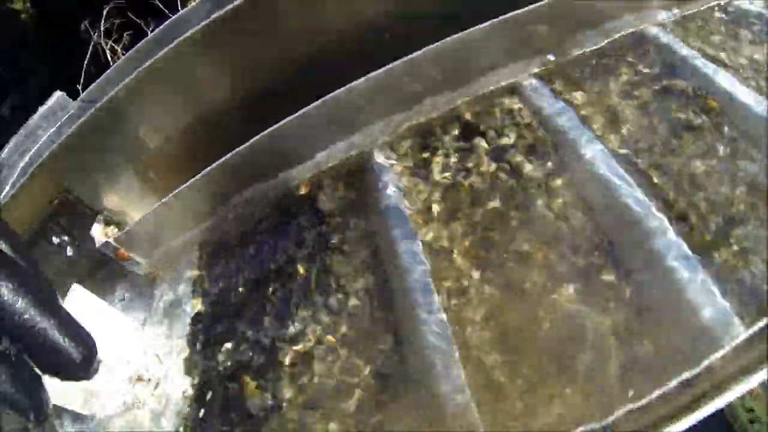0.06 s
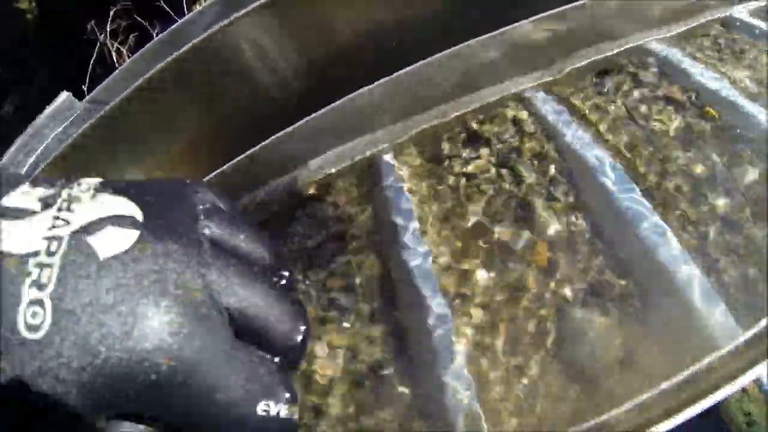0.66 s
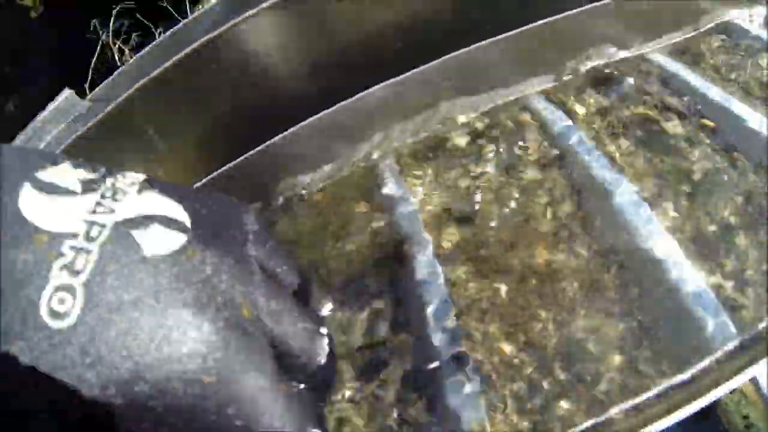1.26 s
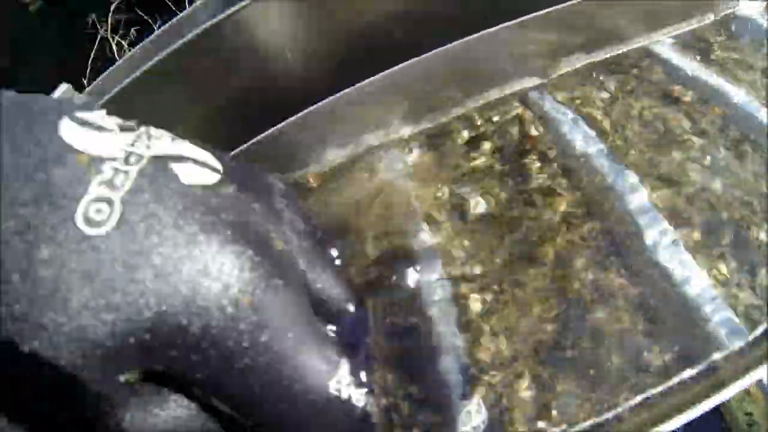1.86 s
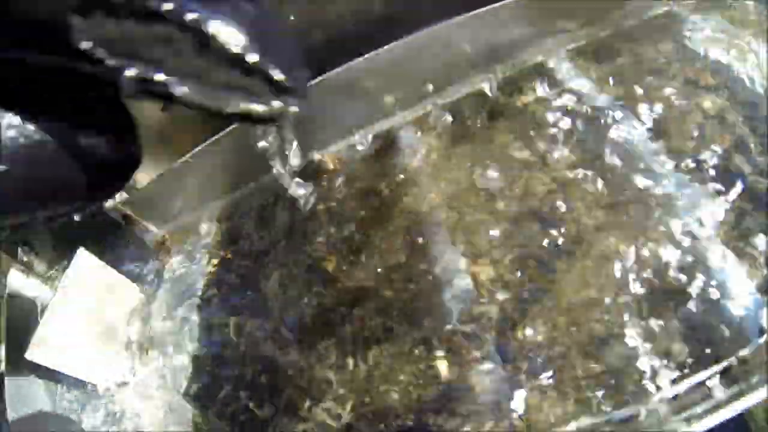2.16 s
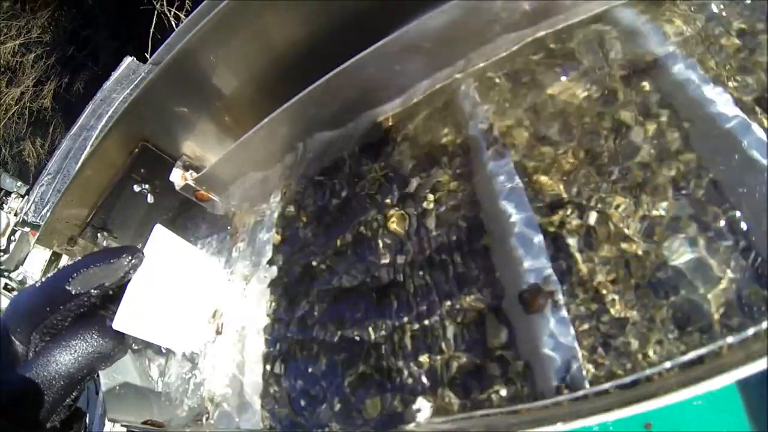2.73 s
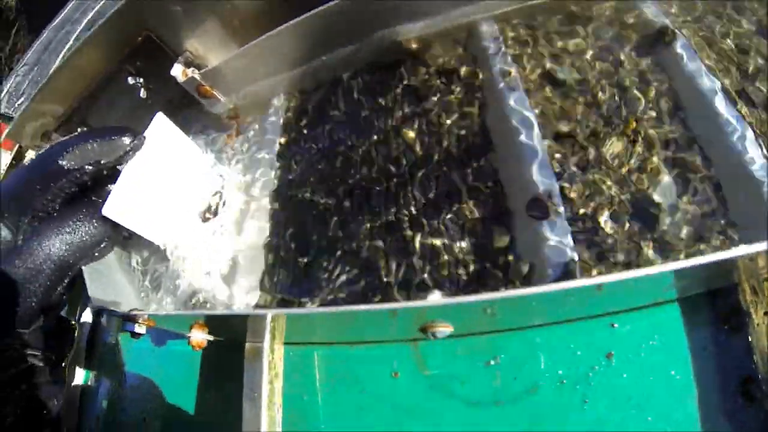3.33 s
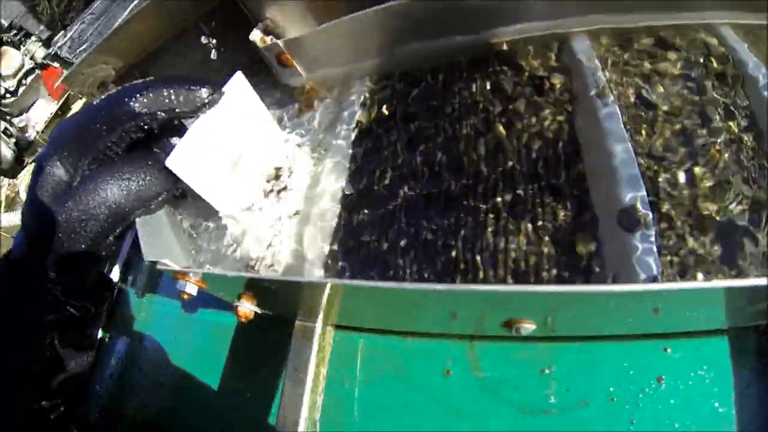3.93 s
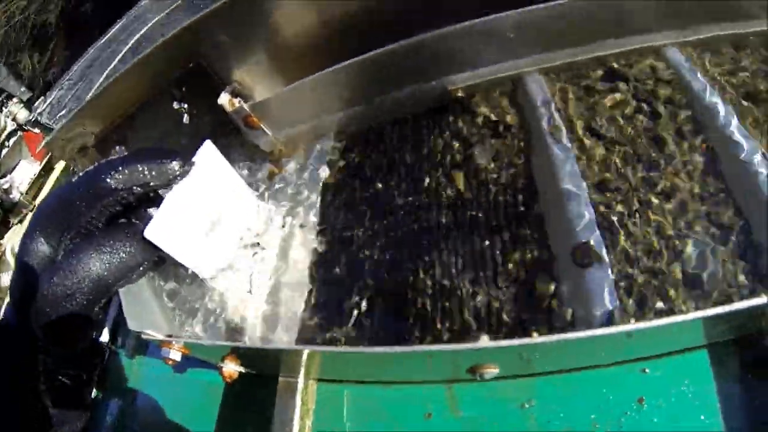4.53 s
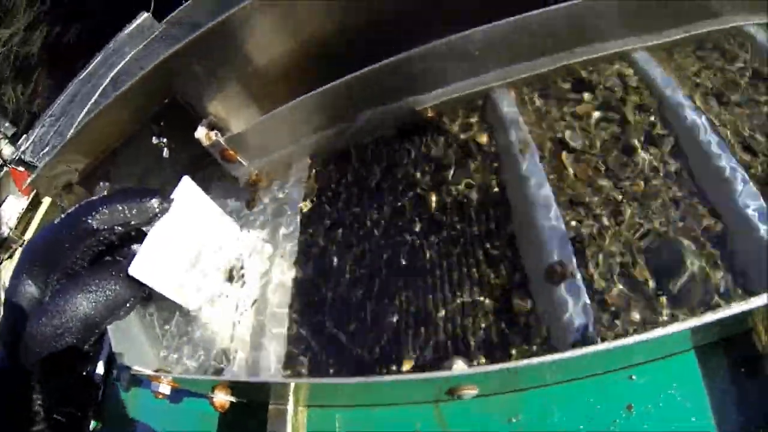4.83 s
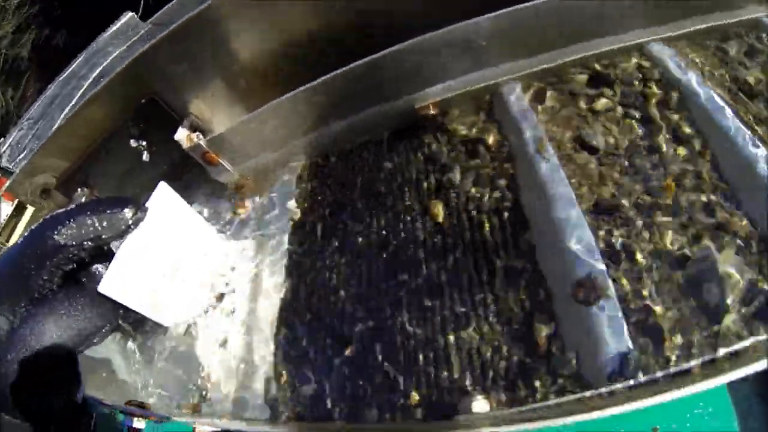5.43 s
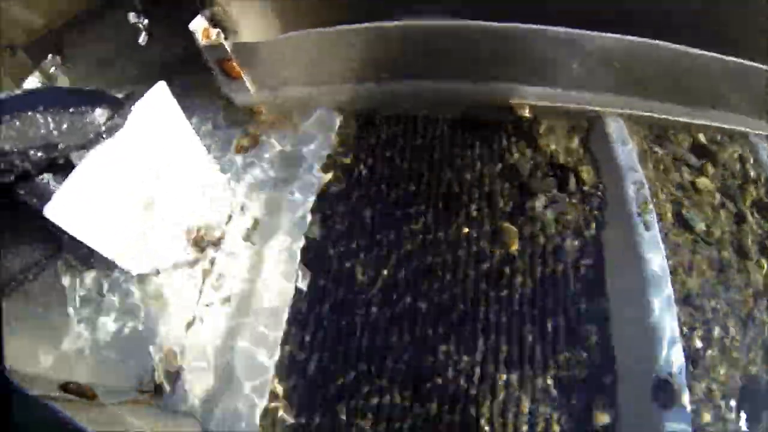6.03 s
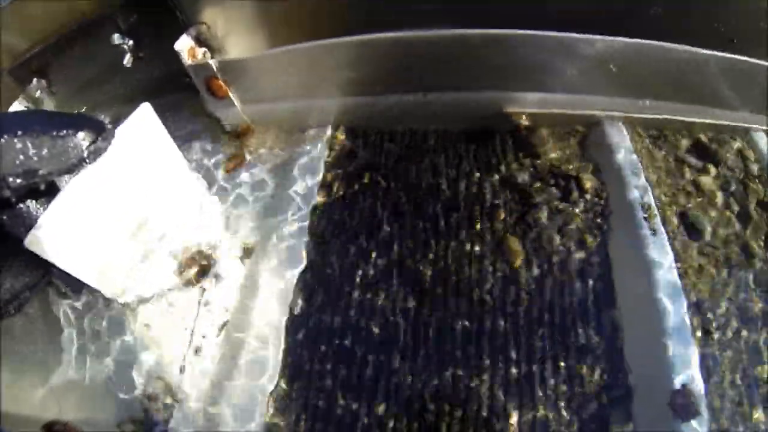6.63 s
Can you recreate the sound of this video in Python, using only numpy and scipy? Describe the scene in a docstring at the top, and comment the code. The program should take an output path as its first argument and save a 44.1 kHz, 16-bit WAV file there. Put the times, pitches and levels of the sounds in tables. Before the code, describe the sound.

Deep throbbing from a pump over a rattling motor and bubbling water, interrupted by a few drips and close handling scrapes.

```python
"""Outdoors at a small gold dredge. Its pump shakes the sluice box with a deep judder, and ticks and
knocks once a turn, while the engine drones and clatters. Water bubbles over the riffles, and a gloved
hand splashes in it a few times. A camera picks up the shaking through its body; its plastic housing
scrapes, rubs and knocks as it is shifted, and the box walls colour the sound at each position."""
import sys
import numpy as np
from scipy import signal
from scipy.fft import rfft, irfft, next_fast_len
from scipy.io import wavfile
from scipy.ndimage import map_coordinates

SR = 44100
rng = np.random.default_rng(int(sys.argv[2]) if len(sys.argv) > 2 else 0)


def put_to_file(sound):
    """Save the sound as 16-bit audio at rate SR, in the file named by the first command-line argument."""
    columns = np.atleast_2d(sound).T  # one column per channel
    safe = np.clip(columns, -1, 1)
    whole_steps = np.round(safe * 32767)
    wavfile.write(sys.argv[1], SR, whole_steps.astype(np.int16))


N = 294588

PUMP_HZ, ENGINE_HZ = 11.014, 25.07  # pump turns and engine cycles a second
FIRST_TICK_S, MOVE_S = .039, .2  # the pump's first tick; the time a camera move takes


# how hard the box sways the camera: (time [s], level [dB])
SWAY_LEVEL = [(0, -7), (2.65, -9), (2.93, -20), (3.25, -12.5), (3.55, -14.5), (3.85, -11.5), (4.9, -11.5),
              (5.5, -21), (5.75, -35), (6.15, -35), (6.46, -27), (6.68, -41)]
# overtones of the shaking: (multiple of the pump rate, steady weight [dB], weight in a swell [dB])
JUDDER_OVERTONES = [(1, -20, -8), (3, -8, -1), (4, 1.5, 1), (5, -14, -10), (6, -5, -9), (7, -11.5, -7),
                    (8, -5.5, 0.5), (9, -13.5, -20.5), (10, -19, -14), (11, -13.5, -13), (12, -14.5, -21.5),
                    (13, -21, -21), (14, -24.5, -19), (16, -28.5, -32)]
# the judder builds and eases: (peak time [s], level [dB], rise [s], fall [s])
JUDDER_SWELLS = [(3.42, -29.5, 0.17, 0.27), (3.98, -26, 0.99, 0.94)]
# tone of the frame's loose rumble: (frequency [Hz], gain [dB])
RUMBLE_EQ = [(20, -2.5), (45, -2), (85, 0), (122, 3.5), (150, -12.5), (200, -14.5), (300, -39), (600, -70)]
# surges of rumble as the camera is jolted: (peak time [s], level [dB], rise [s], fall [s])
RUMBLE_JOLTS = [(2.85, -16, 0.11, 0.12), (3.03, -18.5, 0.041, 0.04), (3.27, -27.5, 0.087, 1.1),
                (3.69, -22, 0.12, 0.21), (4.6, -33, 0.45, 1.55), (5.78, -26, 0.18, 0.2),
                (6.06, -29.5, 0.057, 0.054), (6.47, -30.5, 0.43, 0.46)]

def pump(stroke_lag_s=.0112, judder_db=-29.5, rumble_db=-41.5, surge_db=2):
    """Two strokes a turn sway and judder the box, and its frame rumbles with each stroke."""
    sway_db = curve(SWAY_LEVEL)
    angle = 2 * np.pi * (pump_turns(stroke_lag_s) + .003 * wobble(4))
    sway = unit(np.sin(2 * angle) * amp(.5 * wobble(PUMP_HZ)))  # no two strokes push equally hard
    multiples, steady_db, swell_db = np.transpose(JUDDER_OVERTONES)
    overtones = np.array([harmonic(k, angle) for k in multiples])
    judder_gain = amp(judder_db + .81 * (sway_db - sway_db.mean()))  # rides on the sway
    judder = judder_gain * unit(amp(steady_db) @ overtones)
    judder += swells(JUDDER_SWELLS) * unit(amp(swell_db) @ overtones)
    rumble = coloured(rng.standard_normal(N) * amp(surge_db * np.cos(2 * angle)), RUMBLE_EQ)
    rumble *= np.hypot(amp(rumble_db), swells(RUMBLE_JOLTS))
    judder *= amp(1.07 * wobble(2 * PUMP_HZ))
    return amp(sway_db) * sway + judder + rumble


# metal rung by each firing: (moment in the cycle [0-1], pitch [Hz], relative level [dB], t60 [s])
CASING_RINGS = [(.08, 1155, -6, 0.057), (.45, 1203, -3.5, 0.07), (.06, 1320, -8, 0.11),
                (.22, 1393, -9.5, 0.078), (.22, 1430, -0.5, 0.12), (.06, 1505, -4.5, .07),
                (.06, 2085, -2, 0.059), (.45, 2393, -8, .05)]

def casing_knock(cycles):
    """Each part of the engine casing is struck at its own moment of the cycle and rings."""
    out = np.zeros(N)
    for moment, hz, db, t60 in CASING_RINGS:
        turns = cycles - moment + 1
        since = turns % 1 / ENGINE_HZ
        envelope = each_turn(turns, spread_db=3.74) * amp(db - 60 * since / t60)
        out += envelope * np.sin(2 * np.pi * hz * since + .15 * wobble(25))
    return out


# two buzzes a cycle: (moment in the cycle [0-1], relative level [dB], t60 [s])
BUZZ_HITS = [(.24, 3, .11), (.49, -0.5, .04)]
# the metal box's narrow band of hiss: (frequency [Hz], gain [dB])
BUZZ_EQ = [(4000, -50.5), (5100, -16), (5470, -11.5), (5750, -21.5), (7000, -43.5)]
# fader for the buzz: (time [s], level [dB])
BUZZ_LEVEL = [(0, -63.5), (3, -66.5), (3.9, -75), (5.3, -59.5), (6, -81)]

def box_buzz(cycles):
    """The engine sets the metal box buzzing in a thin, pulsing hiss."""
    pulses = sum(amp(db - 60 * ((cycles - moment) % 1) / ENGINE_HZ / t60)
                 for moment, db, t60 in BUZZ_HITS)
    return amp(curve(BUZZ_LEVEL)) * coloured(pulses * rng.standard_normal(N), BUZZ_EQ)


# fader for the engine as the camera turns: (time [s], level [dB])
ENGINE_FADER = [(0, -43.5), (2.5, -42), (3.3, -40.5), (4.2, -41), (6.68, -40.5)]
# the exhaust's drone: (multiple of the firing rate, level at the mean fader setting [dB])
EXHAUST_HARMONICS = [(5, -48), (6, -52.5), (7, -70.5), (9, -55), (11, -61), (13, -52.5), (14, -54.5),
                     (23, -59), (46, -60), (53, -58.5), (83, -62.5), (86, -60.5)]
# broad tone of the clatter: (frequency [Hz], gain [dB])
CLATTER_EQ = [(100, -6.5), (170, 1.5), (240, 0), (330, -4), (430, -10.5), (580, -10), (800, -10.5),
              (1000, -14), (1150, -3.5), (1450, -5), (1850, -19.5), (2400, -18), (3300, -16), (4500, -22.5),
              (7000, -40)]
# metallic peaks in the clatter: (centre [Hz], width [Hz], gain [dB])
CLATTER_PEAKS = [(1152, 75, 5), (1315, 60, 2), (1430, 60, 4), (1664, 150, 8), (2070, 170, 11),
                 (2310, 110, 10.5), (2880, 310, 4.5)]
# valve gear and exhaust puff:
# (moment in the cycle [0-1], centre [Hz], width [Hz], relative level [dB], t60 [s])
GEAR_CLACKS = [(.06, 2130, 900, -13.5, .025), (0.442, 2150, 800, -21, .02), (0.678, 590, 170, -15, 0.021)]

def engine(beat_db=.5, throb_db=1.76, rattle_db=1):
    """Every firing knocks, clacks and repeats a partly blurred clatter over the exhaust's drone."""
    level_db = curve(ENGINE_FADER)
    cycles = ENGINE_HZ * clock() + .002 * wobble(4)
    angle = 2 * np.pi * cycles
    cycle_samples = round(SR / ENGINE_HZ)
    loop = map_coordinates(rng.standard_normal(cycle_samples), [cycles % 1 * cycle_samples],
                           mode="grid-wrap")
    # the clatter swells with each engine cycle, each pump turn and twice a pump stroke
    pump_angle = 2 * np.pi * pump_turns()
    swell_db = beat_db * np.sin(angle) + throb_db * np.cos(pump_angle)
    swell_db += rattle_db * np.cos(4 * pump_angle)
    blows = amp(swell_db + .9 * wobble(12)) * (.55 * loop + rng.standard_normal(N))
    drone = sum(amp(db + .97 * wobble(2.88)) * harmonic(k, angle) for k, db in EXHAUST_HARMONICS)
    drone *= np.sqrt(2) * amp(level_db - level_db.mean())
    clatter = coloured(blows, CLATTER_EQ, CLATTER_PEAKS)
    clatter += casing_knock(cycles) + clacks(cycles, ENGINE_HZ, GEAR_CLACKS)
    return amp(level_db) * clatter + drone + box_buzz(cycles)


def valve(gain_db, after_tick_s, pitch_hz=545, rise_s=.02, t60_s=.061):
    """A pump valve closes once a turn with a short hollow ring."""
    turns = pump_turns(after_tick_s) + 1
    since = turns % 1 / PUMP_HZ
    ring = np.sin(2 * np.pi * pitch_hz * since + .95 * wobble(60))
    envelope = (1 - np.exp(-since / rise_s)) ** 2 * amp(gain_db - 60 * since / t60_s)
    return each_turn(turns, spread_db=2.1) * envelope * ring


# loose joints: (moment in the turn [0-1], centre [Hz], width [Hz], level [dB], t60 [s])
LINKAGE_CLACKS = [(.01, 1500, 1400, -56.5, .03), (0.699, 1075, 320, -58.5, .03)]

def linkage():
    """The pump's linkage chatters faintly twice a turn."""
    return clacks(pump_turns(), PUMP_HZ, LINKAGE_CLACKS)


# broad tone of the tick: (frequency [Hz], gain [dB])
TICK_EQ = [(2000, -1), (4000, -14), (6000, -9.5), (7500, -8), (8300, -9), (9800, -5.5), (10400, -12),
           (11400, -4), (12400, -12), (15000, -27.5)]
# its ring before the camera swings round: (centre [Hz], width [Hz], gain [dB])
TICK_PEAKS_HIGH = [(9150, 210, 9), (9950, 240, 9.5), (13100, 380, 13)]
# its ring afterwards: (centre [Hz], width [Hz], gain [dB])
TICK_PEAKS_LOW = [(6300, 350, 7), (8400, 480, 15.5), (9350, 300, 3), (9950, 200, 7)]
# fader for the ticks: (time [s], gain [dB])
TICK_FADER = [(0, -58), (2.3, -52.5), (3.2, -49.5), (4.3, -49), (5, -46.5), (5.5, -52), (5.85, -47),
              (6.68, -47)]

def ticks(swing_s=5.7, tail_db=-21, tail_t60_s=.25):
    """One fine, pitched tick with a faint sheen each pump turn; it rings lower after the swing."""
    turns = pump_turns()
    since = turns % 1 / PUMP_HZ
    decay = np.exp(-since / .0042) + amp(tail_db - 60 * since / tail_t60_s)
    envelope = each_turn(turns, spread_db=1) * (1 - np.exp(-since / .0014)) * decay
    noise = rng.standard_normal(N)
    high, low = coloured(noise, TICK_EQ, TICK_PEAKS_HIGH), coloured(noise, TICK_EQ, TICK_PEAKS_LOW)
    swung = fade_in(swing_s, MOVE_S)
    return amp(curve(TICK_FADER)) * envelope * ((1 - swung) * high + swung * low)


# broad tone of the plastic housing: (frequency [Hz], gain [dB])
SHELL_EQ = [(100, -3), (350, -17), (600, -3.5), (750, -11), (1050, -7), (1350, -3), (1550, -9.5),
            (2300, -22.5), (4500, -24.5), (5000, -26.5), (5300, -33.5), (7500, -45.5), (14000, -53.5)]
# its fixed peaks and one dip: (centre [Hz], width [Hz], gain [dB])
SHELL_PEAKS = [(778, 52, 5.5), (1022, 73, 9.5), (1940, 290, 7.5), (2830, 640, 12.5), (3390, 154, -14)]

def shell_ring(body_hz, body_db, squeak_hz, treble_db, shelf_hz=2200, size=2048):
    """The housing's ring after one tap, at peak 1; body and squeak resonances move with the grip."""
    hz = np.fft.rfftfreq(size, 1 / SR)
    peaks = list(SHELL_PEAKS) + [(body_hz, 230, body_db), (squeak_hz, 400, 18.5)]
    shelf = hz ** 4 / (hz ** 4 + shelf_hz ** 4)  # the treble needs firm contact
    cepstrum = irfft(np.log(amp(eq_db(hz, SHELL_EQ, peaks) + treble_db * shelf)))
    # minimum phase puts the attack at the front
    cepstrum[1:size // 2] *= 2
    cepstrum[size // 2 + 1:] = 0
    ring = irfft(np.exp(rfft(cepstrum)))
    return ring / np.abs(ring).max()


# when the housing is in contact: (start [s], end [s])
SCRAPE_GATES = [(2.645, 2.995), (3.54, 3.76), (5.09, 5.7), (5.66, 5.8), (6.32, 6.65)]
# hard scrapes: (peak time [s], level [dB], rise [s], fall [s], body [Hz], squeak [Hz], treble [dB])
SCRAPE_STROKES = [(2.69, -34, 0.11, 0.11, 1400, 3880, -13), (2.765, -22, 0.1, 0.14, 1230, 3856, 0),
                  (2.796, -22, .014, 0.024, 1200, 3860, 6.5), (2.812, -18, 0.0091, 0.05, 1200, 3840, -5),
                  (2.841, -18, 0.054, 0.068, 1090, 3820, 4), (2.91, -27, 0.11, 0.18, 1150, 3880, -1.5),
                  (3.57, -40.5, 0.11, 0.091, 1110, 3920, -10), (3.685, -30.5, 0.086, 0.11, 1360, 4000, -19),
                  (5.145, -33.5, 0.12, 0.062, 1170, 3850, -10), (5.2, -32, .025, 0.045, 1160, 3880, -6),
                  (5.232, -31.5, 0.037, 0.04, 1090, 3880, -5),
                  (5.315, -32.5, 0.072, 0.095, 1190, 3900, -11), (5.745, -35, 0.08, 0.09, 1130, 3840, -8),
                  (6.385, -35.5, 0.082, 0.038, 1170, 3880, -8)]

def scrapes(touch_s=.025):
    """The housing sticks and slips, and each tiny catch rings the shell."""
    out = np.zeros(N)
    slips = unit(grit(per_s=2500) * amp(1.9 * wobble(110)))
    touching = sum(gate(start, end, touch_s) for start, end in SCRAPE_GATES)
    for s, db, rise, fall, body_hz, squeak_hz, treble_db in SCRAPE_STROKES:
        ring = shell_ring(body_hz, body_db=8.5, squeak_hz=squeak_hz, treble_db=treble_db)
        catches = touching * swells([(s, db, rise, fall)]) * np.roll(slips, rng.integers(N))
        out += signal.oaconvolve(catches, ring / np.linalg.norm(ring))[:N]
    return out


# sharp taps on the housing, and a click of gravel at 5.69 s played through the same ring: (time [s], level
# [dB], treble [dB])
KNOCK_HITS = [(2.742, -21, 6), (2.776, -11.5, -5), (2.8074, -1.5, 0), (2.847, -8, -3), (3.004, -18, -12),
              (3.592, -18.5, 0), (3.678, -20, -8), (5.0959, -15.5, -3), (5.148, -22, -6), (5.229, -21, -7),
              (5.6872, -17.5, 2), (6.391, -25, -4)]

def knocks():
    """Single taps let the plastic shell ring freely."""
    out = np.zeros(N)
    for s, db, treble_db in KNOCK_HITS:
        ring = shell_ring(body_hz=1190, body_db=9, squeak_hz=3820, treble_db=treble_db)
        out[round(s * SR):][:len(ring)] += amp(db) * ring
    return out


# dull bumps on the housing: (time [s], level [dB], pitch [Hz], t60 [s])
THUD_HITS = [(3.004, -17.5, 415, 0.018), (6.181, -22, 94, 0.077), (6.300, -18.5, 510, 0.022)]

def thuds(attack_s=.00025):
    """Each bump rings one low, quickly damped tone."""
    out = np.zeros(N)
    for s, db, hz, t60 in THUD_HITS:
        t = np.maximum(clock() - s, 0)
        out += amp(db - 60 * t / t60) * (1 - np.exp(-t / attack_s)) * np.sin(2 * np.pi * hz * t)
    return out


# soft rubs on the housing: (peak time [s], level [dB], rise [s], fall [s])
RUB_STROKES = [(2.75, -27.5, 0.22, 0.38), (3.16, -36.5, 0.23, 0.18), (3.69, -45.5, 0.23, 0.22),
               (5.22, -43, 0.4, 0.1), (5.85, -36.5, 0.25, 0.31)]
# their muffled tone: (frequency [Hz], gain [dB])
RUB_EQ = [(60, -28), (120, 6.5), (260, -2), (400, 6.5), (600, 5.5), (800, -10), (1600, 0.5), (3000, -52),
          (8000, -64.5)]

def rubs():
    """Light friction on the shell makes swells of dull grit."""
    return swells(RUB_STROKES) * coloured(grit(per_s=2000), RUB_EQ)


# splashes and drips: (time [s], peak level [dB], length [s], drop pitch [Hz])
SPLASH_HITS = [(0.806, -43, .012, 7800), (1.396, -49, .075, 6000), (1.447, -44, .055, 6600),
               (1.85, -39, .03, 3200), (1.955, -40, .03, 3800), (1.973, -40.5, .008, 9600),
               (2.007, -49, .005, 7400), (3.132, -27.5, .005, 1800), (3.132, -35, .005, 4500),
               (6.3455, -30, .005, 2600)]

def splashes():
    """A gloved hand throws clusters of drops, thickest at the start; longer splashes hold more. The short burst
    at 6.35 s is a click of gravel, not the hand."""
    out = np.zeros(N)
    for s, db, length, hz in SPLASH_HITS:
        count = 8 + int(length * 1000)
        starts = s + length * rng.random(count) ** 1.6
        pitches = np.clip(hz * np.exp(.22 * rng.standard_normal(count)), 500, 13000)
        drops = bubbles(starts, pitches, rng.uniform(.21, 1, count), cycles=7)
        out += amp(db) * drops / np.abs(drops).max()
    return out


# single bubbles: (time [s], level [dB], starting pitch [Hz])
PLOP_HITS = [(1.818, -35, 1850), (1.830, -33, 1600), (2.0114, -25, 1720), (2.0114, -26.5, 2600),
             (2.0118, -30, 3300), (2.0305, -28.5, 1850), (2.0308, -31, 2350), (3.194, -28, 1550),
             (4.0653, -29, 1900), (6.2663, -30, 1500), (6.3461, -26.5, 2000)]

def plops():
    """Single larger bubbles ring out clearly."""
    s, db, hz = np.transpose(PLOP_HITS)
    return bubbles(s, hz, amp(db), cycles=16)


# tone of the running water: (frequency [Hz], gain [dB])
STREAM_EQ = [(150, -22.5), (400, 7.5), (900, -12.5), (2000, -2), (2900, -5.5), (3500, -4.5), (4300, -10),
             (6000, -11.5), (8000, -18.5), (11600, -18.5), (15000, -36.5)]
# fader for the water: (time [s], level [dB])
STREAM_FADER = [(0, -46.5), (.8, -50.5), (2.5, -46.5), (3.9, -45), (4.8, -47), (6, -44), (6.68, -48.5)]

def stream(count=6000, low_hz=1000, high_hz=6000):
    """Water runs over the riffles: a fizz of small bubbles on a smooth rush."""
    gains = amp(2.5 * rng.standard_normal(count))
    pitches = low_hz * (high_hz / low_hz) ** rng.beta(2, 2, count)
    fizz = bubbles(rng.uniform(0, N / SR, count), pitches, gains, cycles=23)
    level_db = curve(STREAM_FADER) + .72 * wobble(12)
    return amp(level_db) * coloured(unit(fizz) + rng.standard_normal(N), STREAM_EQ)


# bands lifted or hollowed: (start [s], end [s], centre [Hz], width [Hz], gain [dB])
WALL_BANDS = [(0, 2.4, 3800, 500, -2.5), (3.4, 4.6, 3550, 500, 2), (3.4, 5.2, 4950, 300, 0),
              (3.6, 10, 5870, 400, -8), (5.8, 7.6, 4160, 450, -4), (5.8, 5.93, 2090, 180, 5.5),
              (5.8, 5.5, 1170, 150, 0), (5.9, 8, 790, 221, -6)]

def wall_colour(x):
    """Reflections from the box walls colour the sound differently at each camera position."""
    out = x.copy()
    for start, end, centre_hz, width_hz, db in WALL_BANDS:
        band = filtered(x, lambda hz: np.exp(-(2 * (hz - centre_hz) / width_hz) ** 2))
        out += (amp(db) - 1) * gate(start, end, MOVE_S) * band
    return out


def clacks(turns, rate_hz, rows):
    """Once a turn each loose part chatters briefly into its own resonance."""
    out = np.zeros(N)
    for moment, hz, width_hz, db, t60 in rows:
        since = (turns - moment) % 1 / rate_hz
        envelope = each_turn(turns - moment + 1, spread_db=1.5) * amp(-60 * since / t60)
        burst = envelope * rng.standard_normal(N)
        b, a = signal.iirpeak(hz, hz / width_hz, fs=SR)
        out += amp(db) * unit(signal.lfilter(b, a, signal.lfilter(b, a, burst)))
    return out


def bubbles(starts, hz, gains, cycles):
    """Each bubble rings with rising pitch, dying by 27 dB over about that many cycles."""
    t = np.arange(SR // 50) / SR
    age = t * hz[:, None] / cycles
    rings = gains[:, None] * np.exp(-np.pi * age) * np.sin(2 * np.pi * cycles * age * (1 + age / 10))
    samples = np.round(starts * SR).astype(int)[:, None] + np.arange(len(t))
    return np.bincount(samples.ravel(), rings.ravel(), N)[:N]


def grit(per_s):
    """Random tiny catches of either sign, at rms 1."""
    return unit((rng.random(N) < per_s / SR) * rng.uniform(-1, 1, N))


def harmonic(k, angle):
    """A sine at k times a shaft's rate, with random phase."""
    return np.sin(round(k) * angle + rng.uniform(0, 2 * np.pi))


def pump_turns(lag_s=0):
    """Pump turns, counted from lag_s after the first tick."""
    return (clock() - FIRST_TICK_S - lag_s) * PUMP_HZ


def each_turn(turns, spread_db):
    """A new random gain for every turn of a shaft."""
    return amp(spread_db * rng.standard_normal(int(turns[-1]) + 3))[np.floor(turns).astype(int)]


def swells(rows):
    """Summed envelopes, each 20 dB up over its rise and 20 dB down over its fall."""
    t = clock()
    return sum(amp(db - 20 * np.maximum((s - t) / rise, (t - s) / fall)) for s, db, rise, fall in rows)


def fade_in(s, length):
    """0 to 1 over length seconds around time s."""
    return np.clip((clock() - s) / length + .5, 0, 1)


def gate(start, end, fade_s):
    """Fades open at start and shut at end."""
    return fade_in(start, fade_s) - fade_in(end, fade_s)


def curve(rows):
    """A fader move through (time, value) points."""
    return np.interp(clock(), *np.transpose(rows))


def wobble(rate):
    """A smooth random curve, rate knots a second."""
    t = clock()[::16]
    knots = rng.standard_normal(int(N * rate / SR) + 4)
    return np.interp(clock(), t, map_coordinates(knots, [t * rate]))


def peaks_db(hz, peaks):
    """The summed gain of bell-shaped peaks and dips."""
    return sum(db / (1 + (2 * (hz - centre) / width) ** 2) for centre, width, db in peaks)


def eq_db(hz, points, peaks):
    """A broad EQ curve with resonances on it."""
    point_hz, db = np.transpose(points)
    return np.interp(np.log(hz + 1), np.log(point_hz), db) + peaks_db(hz, peaks)


def coloured(x, points, peaks=()):
    """x through that EQ, at rms 1."""
    return unit(filtered(x, lambda hz: amp(eq_db(hz, points, peaks))))


def filtered(x, response):
    """x through a frequency response."""
    size = next_fast_len(N + SR // 2)
    return irfft(rfft(x, size) * response(np.fft.rfftfreq(size, 1 / SR)), size)[:N]


def amp(db):
    """Decibels to gain."""
    return 10 ** (np.asarray(db) / 20)


def unit(x):
    """Scale to rms 1."""
    return x / np.sqrt(np.mean(x ** 2) + 1e-20)


def clock():
    """The time of every sample."""
    return np.arange(N) / SR


def scene():
    """Machinery and water arrive through the air; shaking and handling come through the shell."""
    valves = valve(gain_db=-20, after_tick_s=.031) + valve(gain_db=-28, after_tick_s=.066)
    bed = valves + linkage() + engine() + stream()
    through_air = wall_colour(bed) + ticks() + splashes() + plops()
    through_shell = pump() + rubs() + scrapes() + knocks() + thuds()
    return (through_air + through_shell)[None]


# the microphone port's peak and dip: (centre [Hz], width [Hz], gain [dB])
PORT_PEAKS = [(9350, 490, 4.5), (10300, 540, -2)]
TOP_HZ = 15300

def record(dry):
    """The microphone port colours the treble, and everything above TOP_HZ is cut."""
    return filtered(dry[0], lambda hz: amp(peaks_db(hz, PORT_PEAKS)) * (hz < TOP_HZ))[None]


dry = scene()
out = record(dry)
put_to_file(out)
```